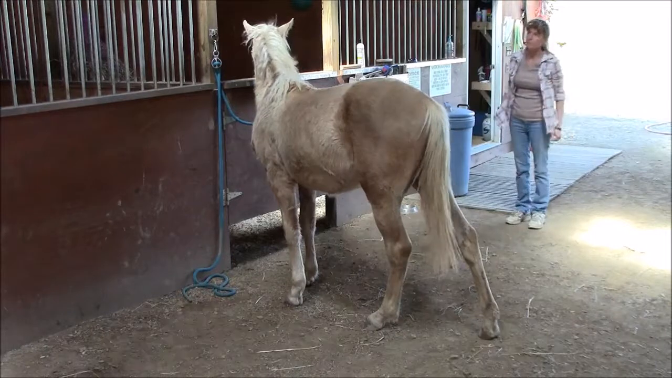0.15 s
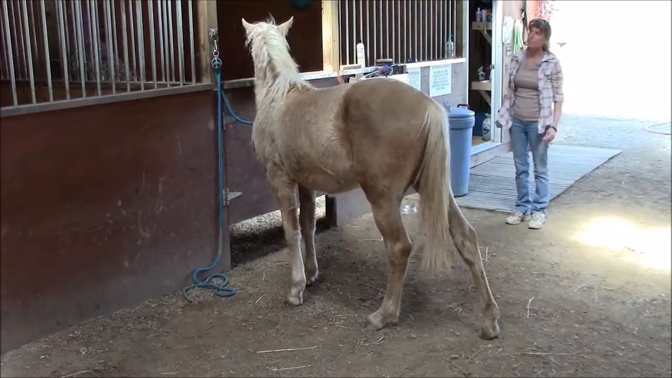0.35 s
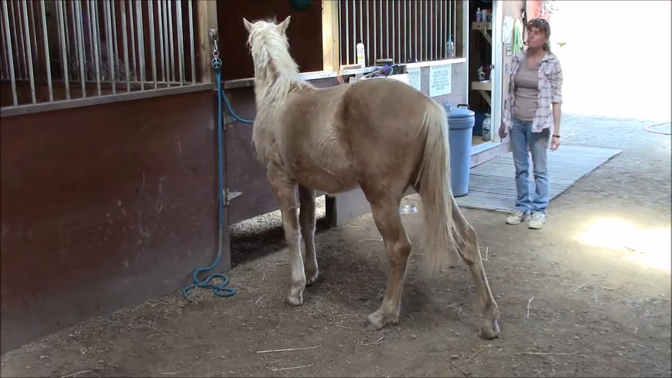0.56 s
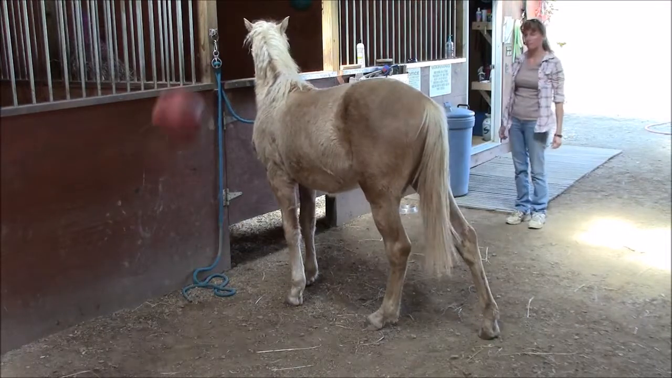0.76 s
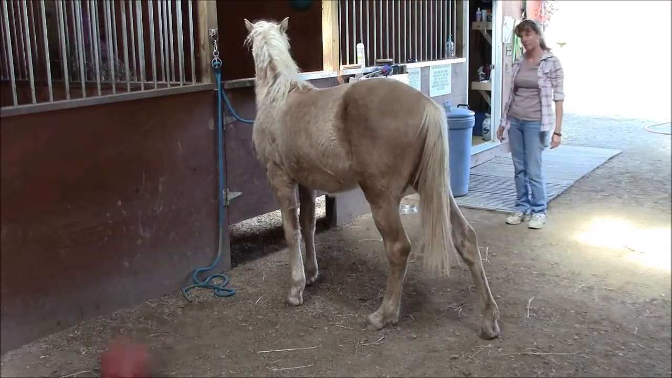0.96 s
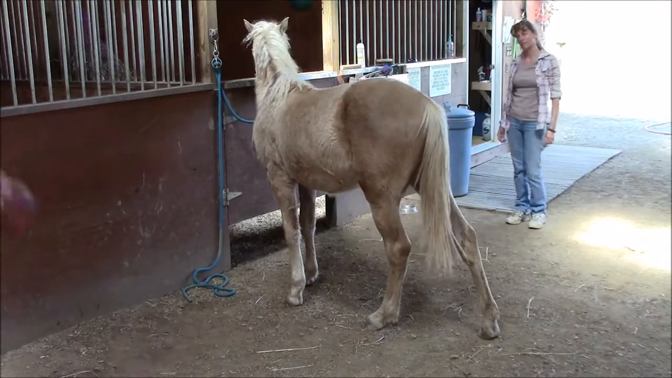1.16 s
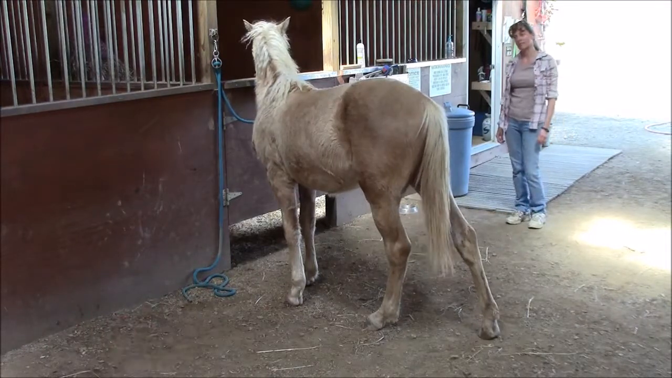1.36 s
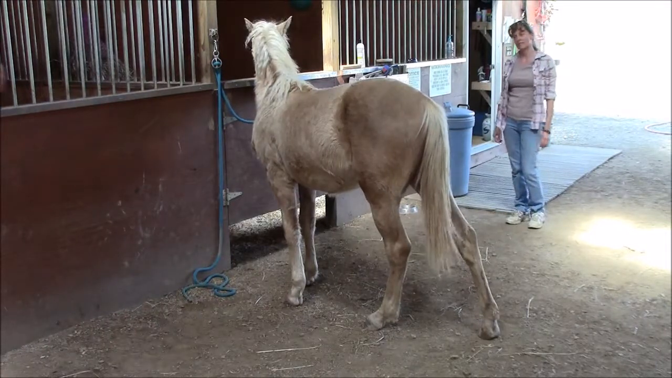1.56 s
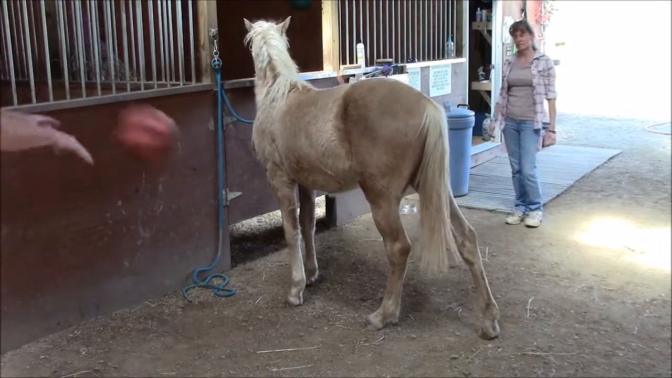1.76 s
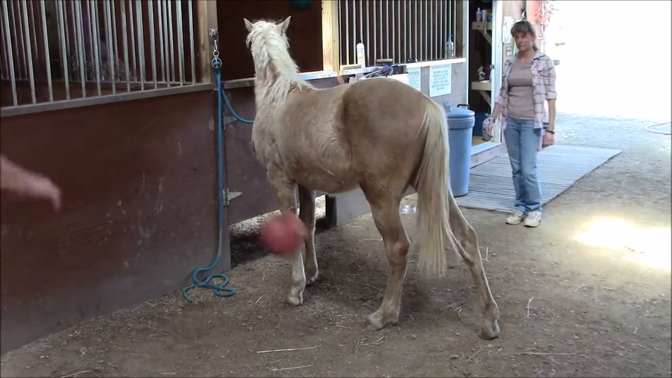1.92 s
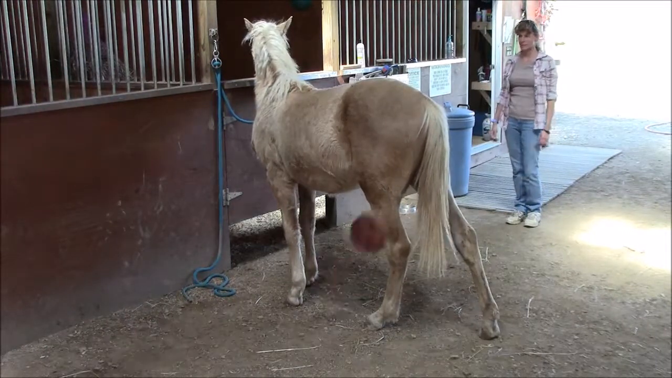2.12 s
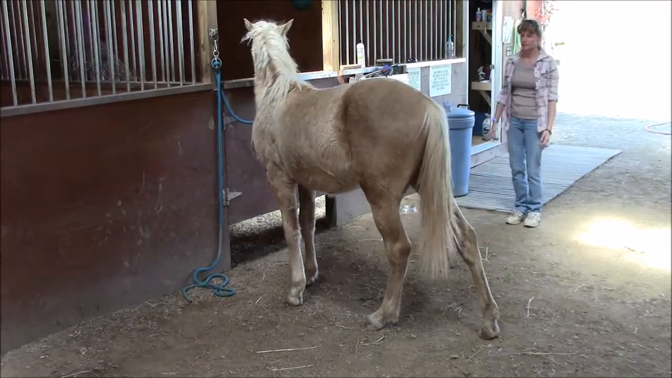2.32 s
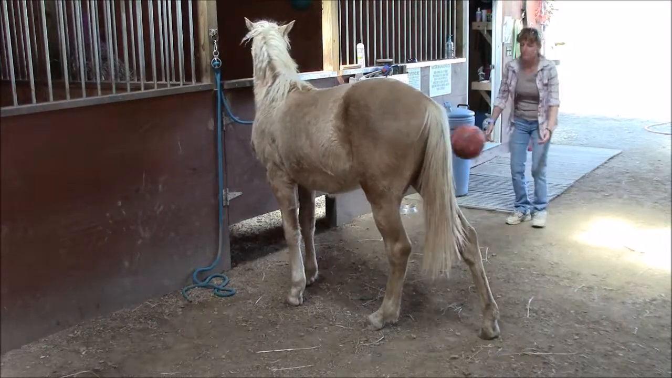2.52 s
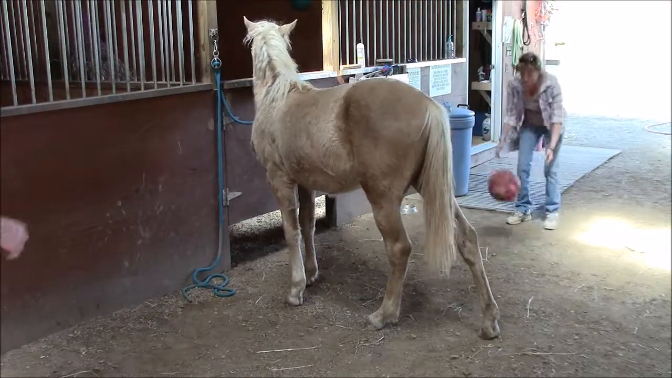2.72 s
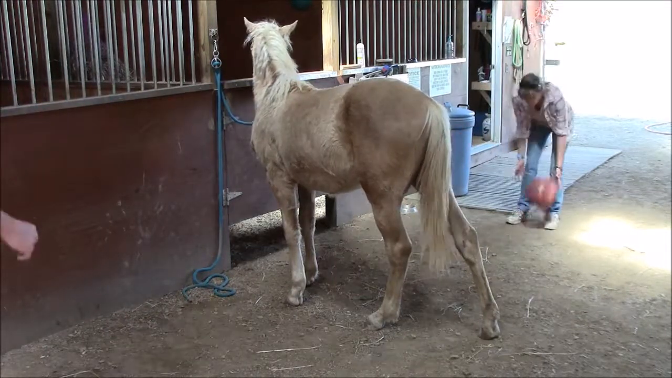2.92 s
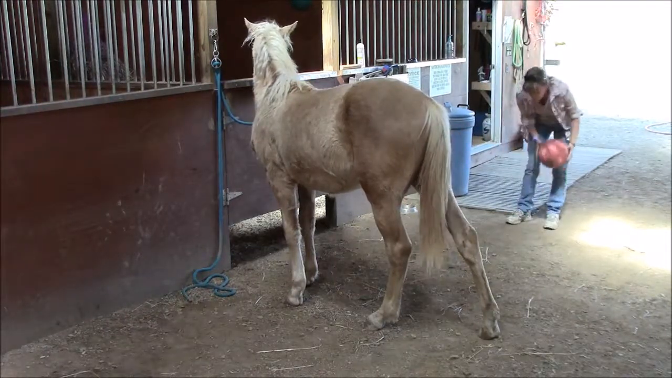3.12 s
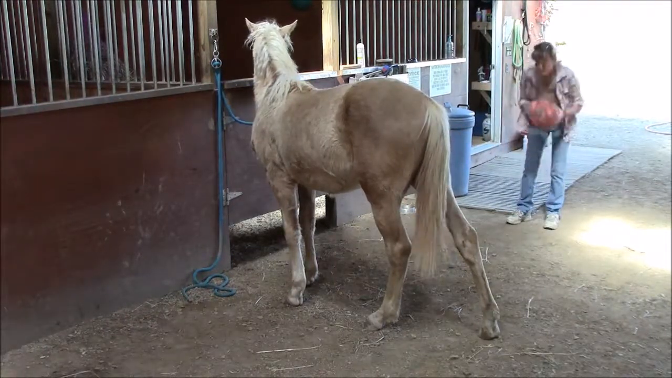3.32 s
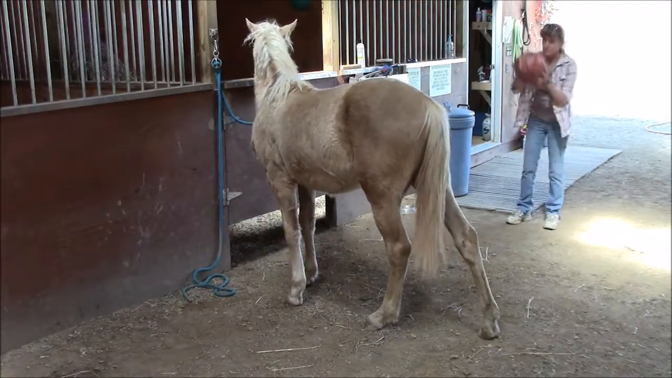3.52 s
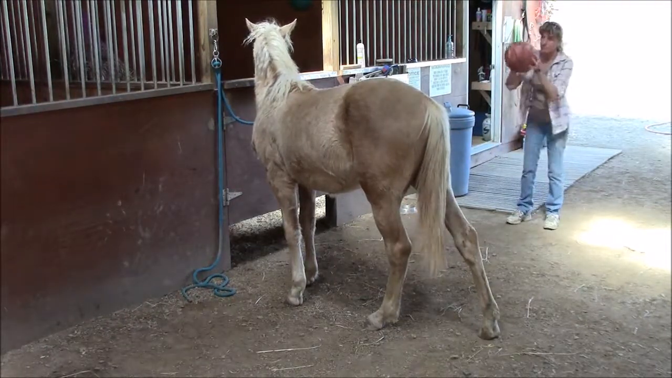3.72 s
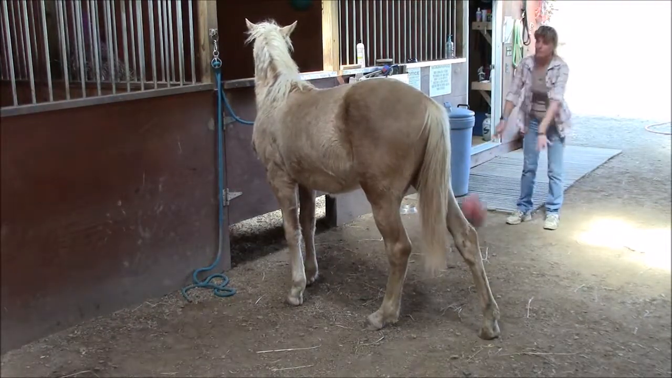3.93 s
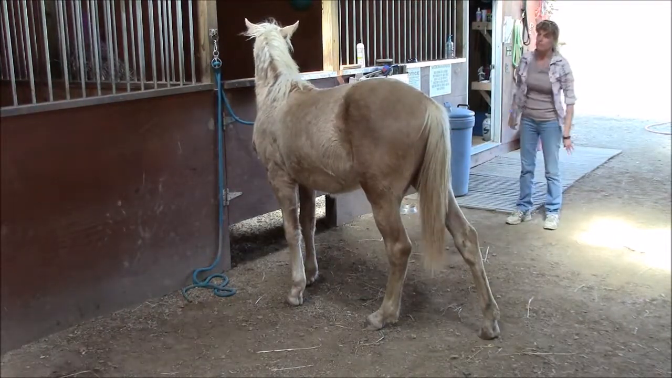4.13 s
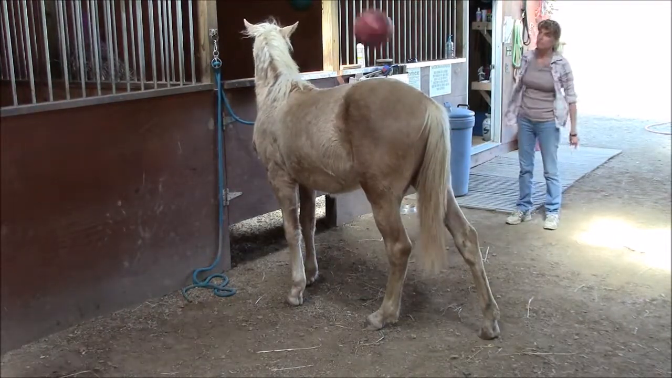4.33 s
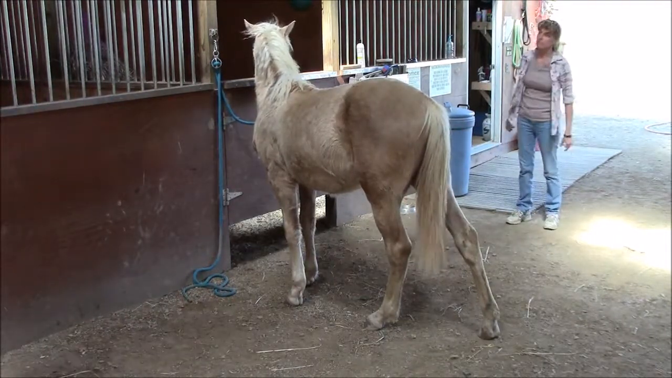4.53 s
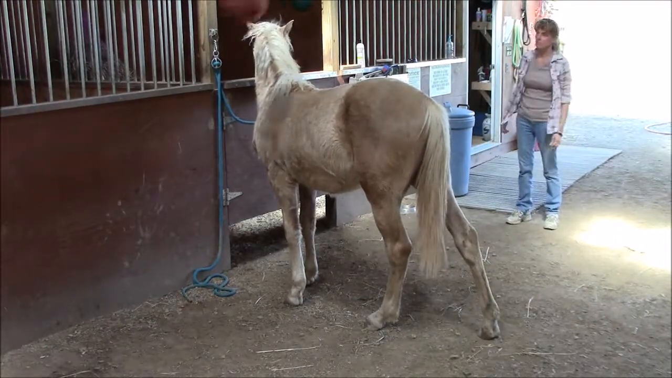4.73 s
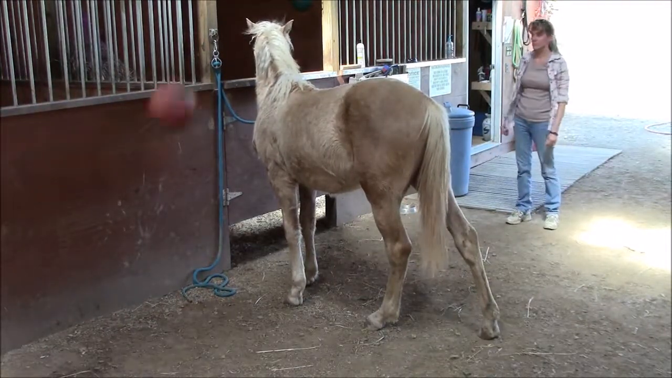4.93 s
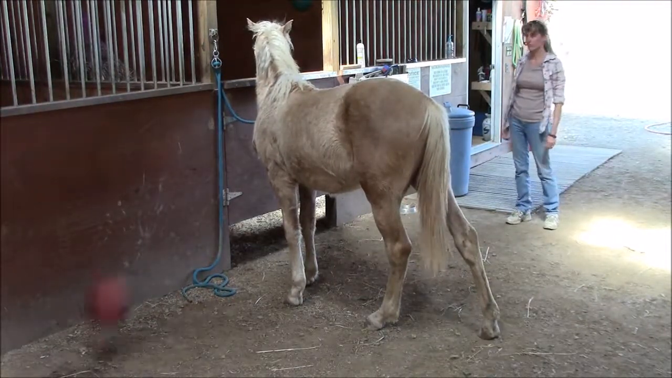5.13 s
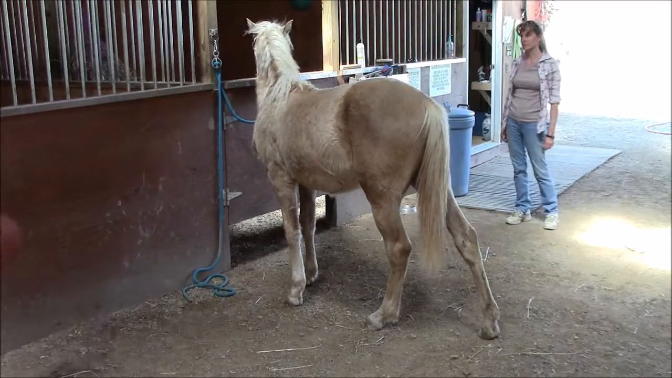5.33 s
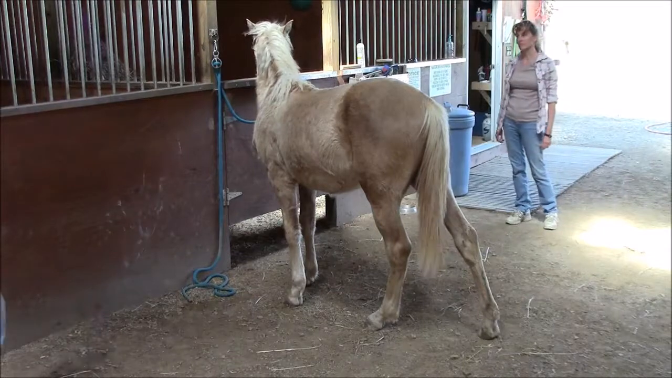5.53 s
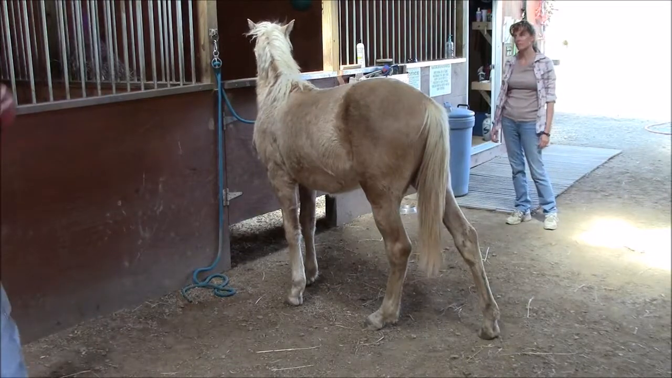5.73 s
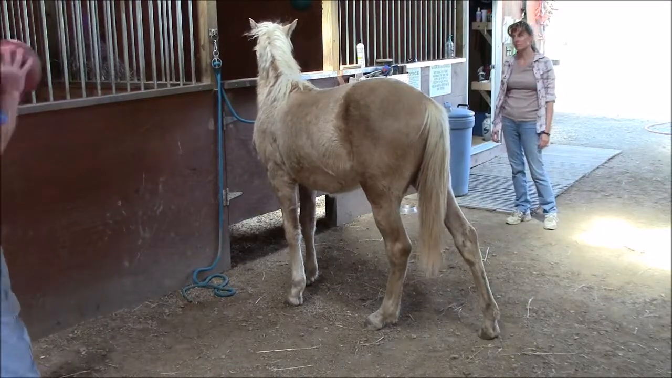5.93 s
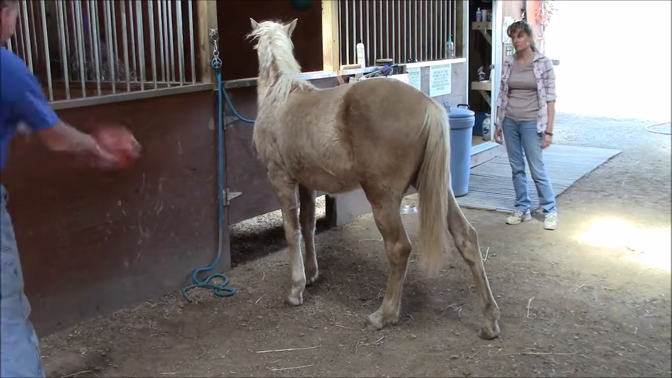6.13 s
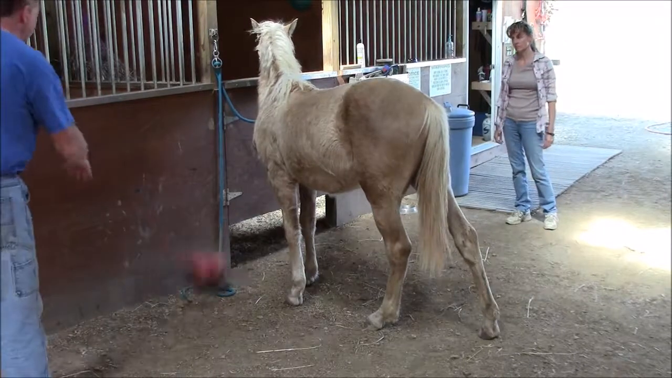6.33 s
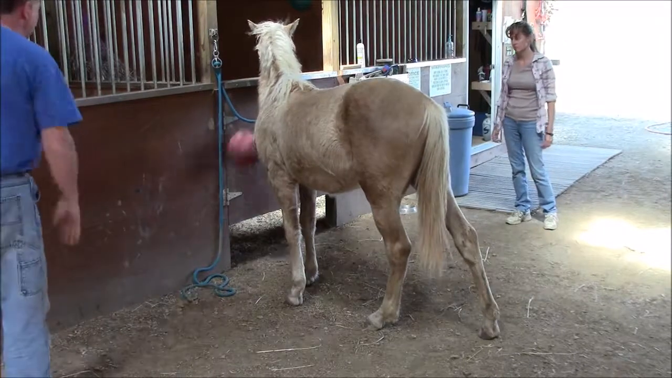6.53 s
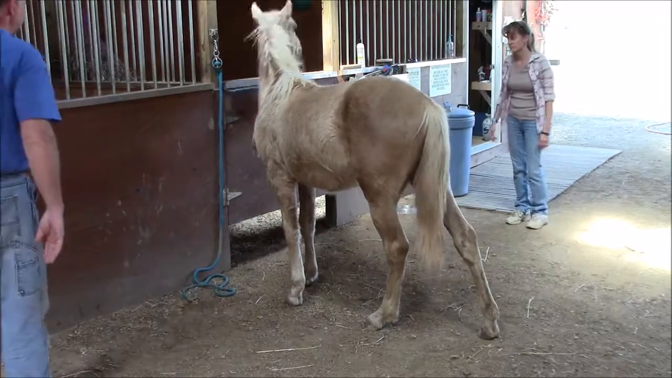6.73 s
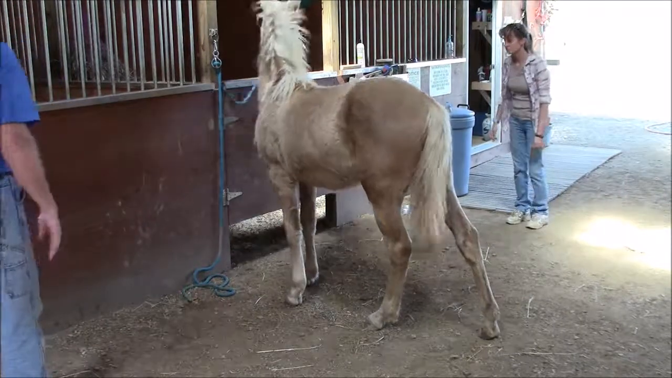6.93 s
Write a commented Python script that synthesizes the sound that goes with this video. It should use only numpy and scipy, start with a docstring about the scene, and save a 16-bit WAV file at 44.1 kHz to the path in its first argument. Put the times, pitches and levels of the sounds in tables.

```python
"""The dying echo of a low thud and a soft footfall, over a low hum and moving air, come first.
Then a small basketball is bounce-passed six times on the packed dirt of a wooden barn aisle, beside a standing horse.
Each bounce sums a damped thump, a filtered rubber slap, a crunch of noise grains and the ringing air in the ball.
Decaying noise gives the barn's echo and damped sines its boom; knocks, scuffs and metal clinks fall between.
Filtered noise makes the air at the open door, and wavering sines make the hum."""
import sys
import numpy as np
from scipy import signal
from scipy.fft import rfft, irfft, next_fast_len
from scipy.io import wavfile
from scipy.ndimage import uniform_filter1d

SR = 44100
rng = np.random.default_rng(int(sys.argv[2]) if len(sys.argv) > 2 else 0)


def materialize(psi):
    """Save the field psi as 16-bit PCM at rate SR to the path in sys.argv[1].

    A 1-D psi becomes a single channel; in a 2-D psi each row is a channel.
    """
    bounded = np.clip(np.atleast_2d(psi).T, -1, 1)
    quanta = np.round(bounded * 32767).astype(np.int16)
    wavfile.write(sys.argv[1], SR, quanta)


N = 307003
TIME = np.arange(N) / SR
TAIL = TIME[:SR]  # the one second given to each short sound

# Impacts of the ball: (time [s], force [dB], distance [m], firmness of dirt [0-1], thump [Hz], shell [Hz],
# shell ring [dB], far wall echo [dB], favoured boom [Hz], lift of that boom [dB])
BOUNCES = [ (0.9767, -0.5, 3.8, 0.08, 247, 1072, -6.5, -11.5, 90, 8),
           (2.0572, -6.5, 3.22, 0.37, 261, 1422, 2, -37, 152, 4.5),
           (2.8655, -9, 3.86, 0.44, 238, 1020, -18, -11, 344, 6),
           (3.9897, -7, 3.28, 1, 171, 1050, -4.5, -5.5, 179.5, 17),
           (5.1966, -11, 2.02, 1, 131, 1080, 0.5, -10.5, 101, 10.5),
           (6.3443, -4.5, 3.4, 0.1, 161, 1270, -4.5, -7.5, 103, 9)]
# Spectrum of the rubber shell's slap: (frequency [Hz], relative level [dB])
SLAP_SPECTRUM = [(40, -45.5), (90, 13.5), (300, -0.5), (500, 1.5), (750, -3.5), (1100, -2.5), (1500, -6.5),
                 (2000, -12), (2900, -16), (4000, -24), (5500, -34.5), (9000, -38), (16000, -69)]
# Partials of the fluttering shell: (ratio to main mode [1], relative level [dB])
SHELL_PARTIALS = [(0.799, -1.5), (0.999, 0), (1.24, -12.5), (1.55, -20.5), (2.4, -54)]
# Resonances of the air inside the ball: (frequency [Hz], relative level [dB], t60 [s])
BALL_AIR_MODES = [(1132, 14.5, 0.15), (1244, 8, 0.4), (1444, -11, 0.74), (1617, 2.5, 0.45), (1760, 8, 0.51),
                  (2325, -20, 0.48), (2930, -14, 0.87), (3730, -37, 0.39)]
# Spectrum of sand grains: (frequency [Hz], relative level [dB])
GRIT_SPECTRUM = [(300, 15), (1500, 2.5), (3500, 0), (5500, -9), (8500, -8), (12000, -14.5), (16000, -24)]
# Standing waves and wall boards of the barn: (frequency [Hz], relative level [dB], t60 [s])
BARN_MODES = [(107.3, 2.5, 1), (131.8, -12, 0.89), (136.2, 6.5, 0.98), (147.5, 0, 0.2), (167, -2, 0.83),
              (232, -3, 1), (251, 6.5, 0.74), (368.7, 1.5, 0.88), (397, 3.5, 0.65), (442, -9, 1),
              (707, -16, 0.66)]
# Reverberation time of the barn: (frequency [Hz], t60 [s])
BARN_T60 = [(60, 0.67), (130, 0.63), (350, 0.98), (700, 0.77), (1300, 0.57), (2500, 0.53), (5000, 0.65),
            (14000, .25)]
# Spectrum of the barn's echo: (frequency [Hz], relative level [dB])
BARN_SPECTRUM = [(40, -10), (90, -1.5), (140, 12.5), (200, -0.5), (300, 4.5), (420, 6.5), (1000, 3),
                 (2000, 2), (4000, -1.5), (8000, -5.5), (16000, -13)]
# Spectrum of a soft contact: (frequency [Hz], relative level [dB])
KNOCK_SPECTRUM = [(40, -26), (120, -6.5), (300, 5.5), (600, -3), (1000, 0.5), (2000, -4), (4000, -12.5),
                  (16000, -5)]
# The ball brushes a hand, a coat or the wall: (time [s], knock [dB], dull above [Hz], rasp [dB])
TAPS = [(1.232, 3.5, 2840, -38.5), (3.236, -14, 4000, -41.5), (4.645, 4.5, 1940, -37),
        (5.419, 4, 2600, -37), (6.587, 11, 1260, -37.5)]
# Low thuds, feet and hooves on the dirt: (time [s], weight [dB], knock dull above [Hz], scuff [dB])
STEPS = [(0.001, -0.5, 675, -72), (0.07, -0.5, 394, -67), (5.511, 5, 150, -53), (5.608, -6, 450, -44),
         (6.655, 3.5, 1060, -37.5), (6.749, 2, 1280, -54), (6.828, -8, 2780, -41), (6.907, 0.5, 878, -49)]
# Resonances of the floor under a foot: (frequency [Hz], relative level [dB], t60 [s])
FLOOR_MODES = [(70.6, -19, 0.15), (121, 9, 0.04)]
# Sharp scrapes on the dirt: (time [s], level [dB])
SCRAPES = [(1.162, -36.5), (3.045, -44), (5.402, -39), (6.088, -46), (6.12, -40.5), (6.602, -32.5)]
# Clinks of a small metal snap: (time [s], level [dB], pitch ratio [1])
CLINKS = [(2.583, -50, 1.08), (6.649, -41.5, 1.08), (6.773, -56, .975), (6.898, -53, 1.025),
          (6.952, -33, 1.09)]
# Resonances of the snap at pitch ratio 1: (frequency [Hz], relative level [dB], t60 [s])
SNAP_MODES = [(9180, -10, 0.19), (9200, -2, 0.077), (10900, -10, 0.043), (11300, -13, .025)]
# Spectrum of the snap's contact: (frequency [Hz], relative level [dB])
TICK_SPECTRUM = [(1000, -31), (4000, 6), (7000, 1), (9800, 1), (13000, -20), (16000, 5)]
# Spectrum of the still barn air: (frequency [Hz], relative density [dB per Hz])
AIR_SPECTRUM = [(20, -6), (45, -11.5), (75, -9), (110, -7), (147, -5), (185, -10), (330, -9.5), (450, -14),
                (950, -21.5), (2000, -26), (4000, -32.5), (8000, -37), (12000, -41.5), (16000, -45)]
# Spectrum of the wash from outdoors: (frequency [Hz], relative level [dB])
WASH_SPECTRUM = [(100, -4.5), (400, -4.5), (900, 1.5), (1900, -2), (2800, -7), (4500, -23), (16000, -35)]
# Machine hum: (mean frequency [Hz], mean level [dB])
HUM = [(146, -49), (2040, -70.5)]

# A full bounce on loose dirt heard from REF_M, then the changes on fully packed dirt
REF_M = 3
SLAP_DB, THUMP_DB, CRACK_DB, CRUNCH_DB = 33, -5, -4, -24
FIRM_THUMP_DB, FIRM_CRACK_DB, FIRM_CRUNCH_DB = 5.5, 9, -28
# The deeper the thump, the hollower the slap; the more the shell rings, the more the slap gathers at its pitch
HOLLOW_HZ, HOLLOW_DB_PER_OCT = 152.5, 12
FOCUS_DB, FOCUS_PER_RING = 4.5, 0.5
PING_DB = -67.5  # ringing air relative to the slap
# Kicked-up grit rains back, less of it from packed dirt
FALL_AFTER_S, FALL_PEAK_S, FALL_DB, FIRM_FALL_DB = 0.1, 0.2, -45.5, -23
# Reflections and standing waves of the barn
STALL_WALL_S, STALL_WALL_SHARE, FAR_WALL_S = 0.0049, 0.19, 0.066
ROOM_DB, THUMP_ROOM_DB, FLUTTER_ROOM_DB, SMALL_ROOM_DB = -5, -4, -8, -4
BOOM_DB, BOOM_OCTAVES, BOOM_DELAY_S, BOOM_BUILD_S = -23, 0.32, 0.00823, 0.004
# Footfalls and grazes
STEP_KNOCK_DB, STEP_THUD_DB, STEP_SHAKE_DB = 3.5, -34, -44
BRUSH_S, STEP_SCUFF_S, SCRAPE_S = 0.011, 0.068, 0.019  # decay times to 1 / e
# A breeze gets up outdoors, lifting the wash at the door and the draught on the microphone
BREEZE_AT_S, BREEZE_RISE_S = 3.46, 0.27
AIR_DB, WASH_DB, WASH_LIFT_DB, DRAUGHT_DB, DRAUGHT_LIFT_DB = -46.5, -58, 8.5, -55, 12


def ball():
    """Impact excitation: force sets level, distance the share of echo, firm dirt trades crunch for thump and crack."""
    out = np.zeros((2, N))
    for s, force_db, metres, firm, thump_hz, shell_hz, shell_db, far_db, boom_hz, lift_db in BOUNCES:
        slap_db = SLAP_DB + force_db
        thump_db = THUMP_DB + force_db + FIRM_THUMP_DB * firm
        near = REF_M / metres
        thump = ball_thump(thump_db, thump_hz)
        slap = shell_slap(slap_db, firm, thump_hz, shell_hz, shell_db)
        flutter = shell_flutter(force_db + shell_db, shell_hz)
        crunch = undb(CRUNCH_DB + FIRM_CRUNCH_DB * firm) * grit(die(0.0082), sparkle_db=10)
        ping = undb(slap_db + PING_DB) * ring(BALL_AIR_MODES)
        add(out, s, near * (thump + slap + flutter + crunch + ping))
        falling = undb(FALL_DB + FIRM_FALL_DB * firm) * grit(pulse(FALL_PEAK_S))
        add(out, s + FALL_AFTER_S, near * falling)
        # the stall wall throws the slap straight back
        add(out, s + STALL_WALL_S, near * STALL_WALL_SHARE * (slap + flutter))
        # thump and flutter spread less through the aisle than the slap
        spread = slap + crunch + undb(THUMP_ROOM_DB) * thump + undb(FLUTTER_ROOM_DB) * flutter
        echo = signal.fftconvolve(spread, barn(), axes=1)[:, :SR]
        add(out, s, undb(ROOM_DB) * echo)
        # the end of the aisle returns a duller copy
        far_echo = colour(echo, far_db + dull(bins(TAIL), 2200, order=2))
        add(out, s + FAR_WALL_S, near * far_echo)
        add(out, s + BOOM_DELAY_S, barn_boom(thump_db, boom_hz, lift_db))
    return out


def ball_thump(db, hz):
    """Volume displacement: the ball flattens and springs back, pushing the air for a cycle or two."""
    thump = undb(db) * pulse(0.0028) * np.cos(2 * np.pi * hz * TAIL)
    # a small ball radiates little below its thump
    return colour(thump, dull(0.19 * hz, bins(TAIL), order=1))


def shell_slap(db, firm, thump_hz, shell_hz, shell_db):
    """Broadband impact: a brief contact force is shaped by the resonances of the rubber shell."""
    f = bins(TAIL)
    hollow_db = HOLLOW_DB_PER_OCT * np.log2(HOLLOW_HZ / thump_hz)
    crack_db = CRACK_DB + FIRM_CRACK_DB * firm
    tone_db = read(SLAP_SPECTRUM, f)
    tone_db = tone_db + (FOCUS_DB + FOCUS_PER_RING * shell_db) * bump(f, shell_hz, 0.53)
    tone_db = tone_db + hollow_db * (bump(f, 490, 0.18) + bump(f, 163, 0.32))
    tone_db = tone_db + crack_db * bump(f, 3140, 0.6)
    return colour(contact(0.002), db + tone_db)


def shell_flutter(db, shell_hz):
    """Damped modal vibration: inharmonic partials of the shell last a few cycles."""
    partials = sum(undb(part_db) * np.sin(2 * np.pi * ratio * shell_hz * TAIL)
                   for ratio, part_db in SHELL_PARTIALS)
    return undb(db) * pulse(0.002) * partials


def grit(envelope, sparkle_db=2, uneven_db=4.5):
    """Granular noise: sand grains of uneven size, slightly different at each ear."""
    sizes = undb(uneven_db * np.repeat(rng.standard_normal(SR // 30), repeats=30))
    grains = rng.standard_normal((2, SR)) * sizes
    f = bins(grains)
    mid, side = unit(colour(grains, read(GRIT_SPECTRUM, f) + sparkle_db * bump(f, 13700, 0.8)))
    return (mid + 0.088 * np.array([side, -side])) * envelope


def barn_boom(thump_db, boom_hz, lift_db):
    """Modal excitation: the thump drives standing waves, each spot on the floor favouring those near one pitch."""
    modes = [(hz, db + lift_db * bump(hz, boom_hz, BOOM_OCTAVES), t60) for hz, db, t60 in BARN_MODES]
    return undb(thump_db + BOOM_DB) * ring(modes) * (1 - die(BOOM_BUILD_S))


def barn(build_s=0.0021, lumpy_db=1.5):
    """Diffuse reverberation: clustered reflections off boards and rafters decay at a rate set by frequency."""
    f = bins(TAIL)
    clusters = undb(lumpy_db * walk(222.0)[:SR])
    noise = rfft(rng.standard_normal((2, SR)) * clusters)
    swell = 1 - np.exp(-np.maximum(TAIL - 0.006, 0) / build_s)
    out = 0
    for hz in np.geomspace(40, 16000, 18):
        band = np.cos(np.pi / 2 * np.clip(2 * np.log2(f / hz), -1, 1)) ** 2
        tail = unit(irfft(noise * band, SR) * (swell * fade(read(BARN_T60, hz))))
        # level follows bandwidth
        out = out + tail * np.sqrt(np.mean(band) / SR) * undb(read(BARN_SPECTRUM, hz))
    return stereo(*out, [(100, -15), (1000, -26), (2500, -17.0), (5000, -25), (12000, -43)])


def small_sounds():
    """Superposition: taps, footfalls, scrapes and clinks add linearly."""
    out = np.zeros((2, N))
    add_taps(out)
    add_footfalls(out)
    add_scrapes(out)
    add_clinks(out)
    return out


def knock(db, top_hz):
    """Compliant contact: a soft surface gives a brief push with little treble."""
    f = bins(TAIL)
    return colour(contact(0.0027), db + read(KNOCK_SPECTRUM, f) + dull(f, top_hz))


def add_taps(out):
    """Contact and friction: each touch of the ball is a soft knock with a rasp."""
    for s, db, top_hz, rasp_db in TAPS:
        add(out, s, knock(db, top_hz) + undb(rasp_db) * grit(die(BRUSH_S)))


def add_footfalls(out):
    """Impact on a damped floor: a thud or step sums a knock, floor modes, a low shake and a granular scuff."""
    for s, db, top_hz, scuff_db in STEPS:
        shake = unit(colour(rng.standard_normal(SR), dull(bins(TAIL), 45))) * pulse(0.046)
        floor = undb(STEP_THUD_DB) * ring(FLOOR_MODES) + undb(STEP_SHAKE_DB) * shake
        scuff = undb(scuff_db) * grit(die(STEP_SCUFF_S))
        add(out, s, knock(db + STEP_KNOCK_DB, top_hz) + undb(db) * floor + scuff)


def add_scrapes(out):
    """Granular friction: a short burst of grains marks each sharp scrape."""
    for s, db in SCRAPES:
        add(out, s, undb(db) * grit(die(SCRAPE_S)))


def add_clinks(out):
    """Modal ringing: a noisy tick of contact accompanies the damped modes of the metal snap."""
    for s, db, pitch in CLINKS:
        tick = unit(colour(rng.standard_normal((2, SR)), read(TICK_SPECTRUM, bins(TAIL)))) * die(0.007)
        modes = [(hz * pitch, mode_db, t60) for hz, mode_db, t60 in SNAP_MODES]
        add(out, s, undb(db) * (tick + ring(modes)))


def background():
    """Superposition of steady sources: barn air, outdoor wash, draught and hum."""
    wind = 0.5 + 0.5 * np.tanh((TIME - BREEZE_AT_S) / BREEZE_RISE_S)
    return still_air() + outdoor_wash(wind) + draught(wind) + machine_hum()


def still_air():
    """Stationary random noise: the barn air keeps a fixed spectrum and a nearly steady level."""
    width_db = [(30, -5), (150, -6.5), (1000, -4.5), (3000, -7.0), (7000, -7.0), (14000, -4)]
    return stereo_noise(AIR_SPECTRUM, width_db) * undb(AIR_DB + 0.5 * walk(5.4))


def outdoor_wash(wind):
    """Modulated noise: the wash from outdoors rises with the breeze."""
    level_db = WASH_DB + WASH_LIFT_DB * wind + 1.8 * walk(4.12)
    return stereo_noise(WASH_SPECTRUM, [(300, -24), (4000, -12.5)]) * undb(level_db)


def draught(wind):
    """Turbulent pressure: gusts on the microphone give low noise that rises with the breeze."""
    spectrum = [(8, -8), (25, -9.5), (60, -4.5), (120, -10.5), (500, -52), (4000, -84)]
    level_db = DRAUGHT_DB + DRAUGHT_LIFT_DB * wind + 2.5 * walk(8)
    return stereo_noise(spectrum, [(30, 5), (100, -2)]) * undb(level_db)


def machine_hum():
    """Frequency and amplitude modulation: each sine of the hum wavers in pitch and level."""
    out = 0
    for hz, db in HUM:
        level = undb(db + 2 * walk(11.0))
        phase = 2 * np.pi * np.cumsum(hz + 2.48 * walk(7.8)) / SR
        out = out + level * np.sqrt(2) * np.sin(phase)
    return out


def stereo_noise(points, width_db):
    """Spectral shaping: filtered white noise in stereo, scaled to rms 1."""
    noise = rng.standard_normal((2, next_fast_len(N, True)))
    mid, side = irfft(rfft(noise) * undb(read(points, bins(noise))), noise.shape[-1])
    return unit(stereo(mid, side, width_db)[:, :N])


def stereo(mid, side, width_db):
    """Mid-side coding: the side gain at each frequency sets how far the channels differ."""
    side = irfft(rfft(side) * undb(read(width_db, bins(side))), len(side))
    return np.array([mid + side, mid - side])


def walk(rate):
    """Twice-smoothed random steps: slow chance with a spread near 1, stepping at the given rate in Hz."""
    k = int(SR / rate)
    steps = np.repeat(rng.standard_normal(N // k + 1), k)
    return 1.37 * uniform_filter1d(uniform_filter1d(steps, k), k)[:N]


def contact(length_s):
    """Impulsive excitation: an irregular short push, with its energy evened out over frequency."""
    push = rng.standard_normal(SR) * TAIL / length_s * np.exp(-TAIL / length_s)
    power = uniform_filter1d(abs(rfft(push)) ** 2, size=160)
    return colour(push, -10 * np.log10(np.maximum(power, 1e-9)))


def ring(modes):
    """Modal superposition: struck modes die away as damped sines."""
    return sum(undb(db) * np.sin(2 * np.pi * hz * TAIL) * fade(t60) for hz, db, t60 in modes)


def fade(t60):
    """Exponential decay: level falls 60 dB in t60 seconds."""
    return np.exp(-np.log(1000) * TAIL / t60)


def die(seconds):
    """Exponential decay: a sudden start falls to 1 / e in the given time."""
    return np.exp(-TAIL / seconds)


def pulse(peak_s):
    """Critically damped response: a smooth swell reaches 1 at peak_s and dies away."""
    return TAIL / peak_s * np.exp(1 - TAIL / peak_s)


def colour(x, db):
    """Minimum-phase filtering: the folded cepstrum gives a causal filter with the given gains."""
    n = x.shape[-1]
    cepstrum = irfft(np.log(undb(db)), n)
    cepstrum[1:n // 2] *= 2
    cepstrum[n // 2 + 1:] = 0
    return irfft(rfft(x) * np.exp(rfft(cepstrum)), n)


def dull(f, hz, order=3):
    """Low-pass response: gain in dB at f, half power at hz."""
    return -10 * np.log10(1 + (f / hz) ** (2 * order))


def bump(f, hz, octaves):
    """Resonance curve: a Gaussian bell on the log-frequency axis."""
    return np.exp(-0.5 * (np.log2(f / hz) / octaves) ** 2)


def read(points, hz):
    """Logarithmic interpolation: a (frequency [Hz], value) table joined on a log-frequency axis."""
    f, value = np.transpose(points)
    return np.interp(np.log(np.maximum(hz, 1)), np.log(f), value)


def bins(x):
    """Discrete spectrum: the frequencies of x in Hz, held to at least 1."""
    return np.maximum(np.fft.rfftfreq(x.shape[-1], 1 / SR), 1)


def undb(db):
    """Logarithmic level: decibels to amplitude gain."""
    return 10 ** (np.asarray(db) / 20)


def unit(x):
    """Power normalisation: scale to rms 1."""
    return x / np.sqrt(np.mean(x ** 2))


def add(track, s, sound):
    """Linear superposition: lay a sound into a track at time s."""
    start = int(np.clip(s * SR, 0, N - 1))
    track[..., start:start + SR] += sound[..., :N - start]


def scene():
    """Superposition with convolution: all sources add, and the small sounds gain the barn's echo."""
    small = small_sounds()
    echo = signal.fftconvolve(small, barn(), axes=1)[:, :N]
    return ball() + small + undb(SMALL_ROOM_DB) * echo + background()


def record(dry):
    """Saturation and band limiting: high peaks are rounded, the top is cut and a small offset is added."""
    rounded = dry / (1 + dry ** 8) ** (1 / 8)
    low_pass = signal.ellip(10, 0.1, 80, 15800, fs=SR, output="sos")  # ripple dB, stop dB, edge Hz
    return signal.sosfilt(low_pass, rounded) + 0.01


dry = scene()
out = record(dry)
materialize(out)
```